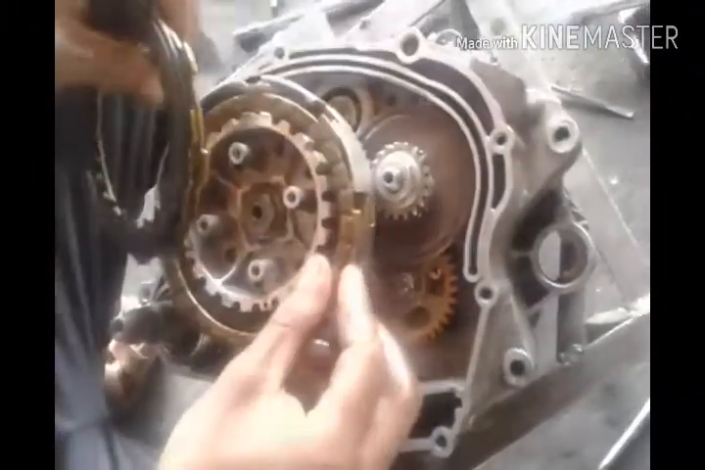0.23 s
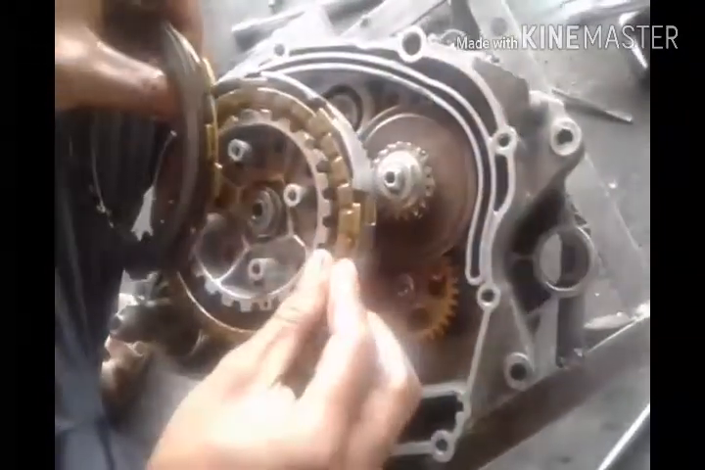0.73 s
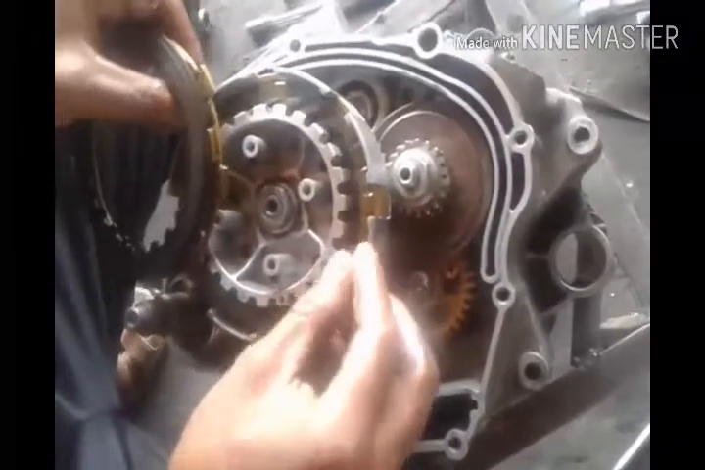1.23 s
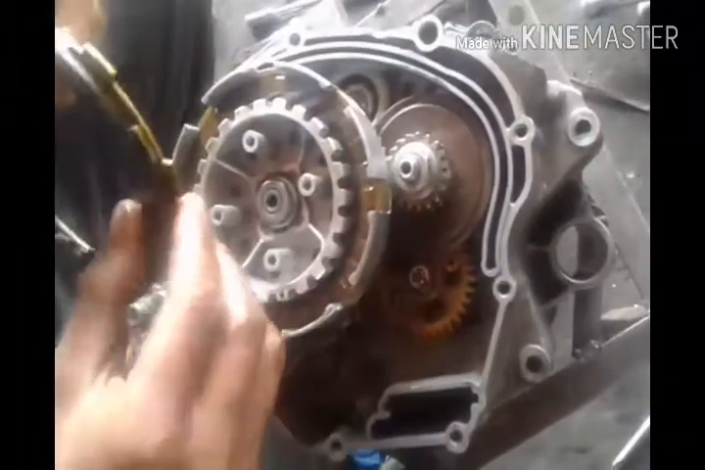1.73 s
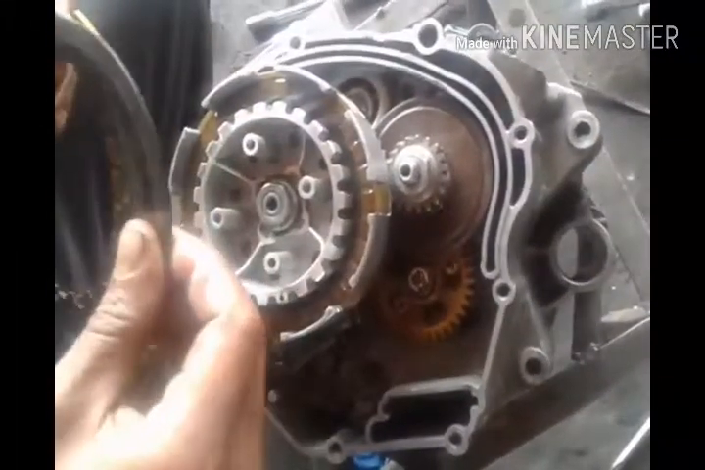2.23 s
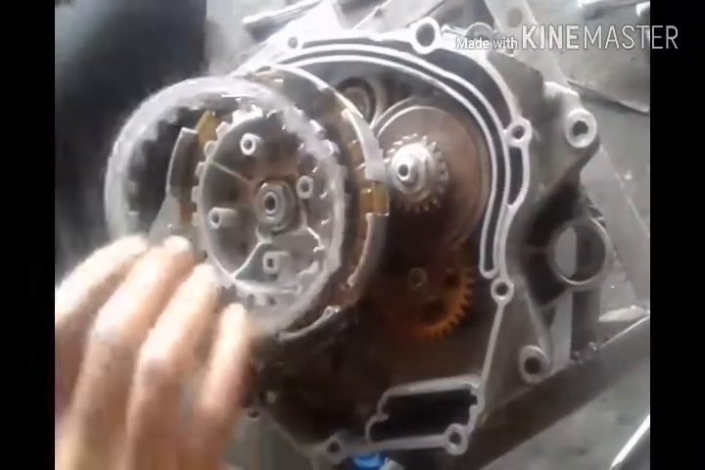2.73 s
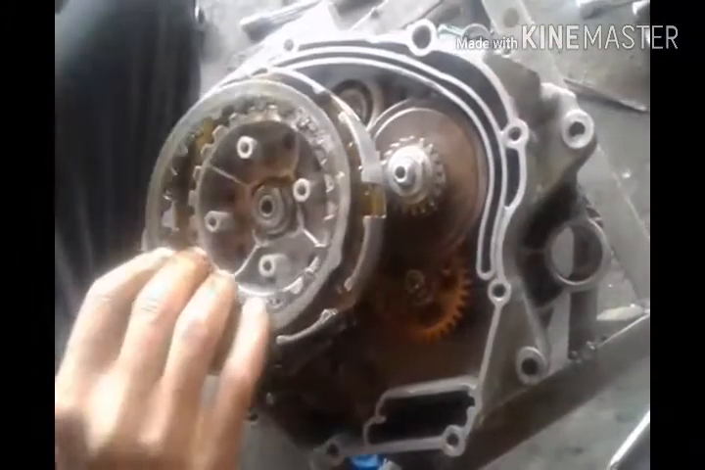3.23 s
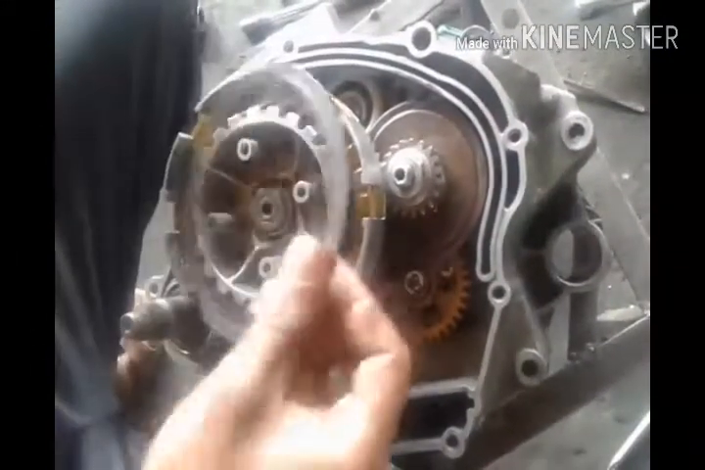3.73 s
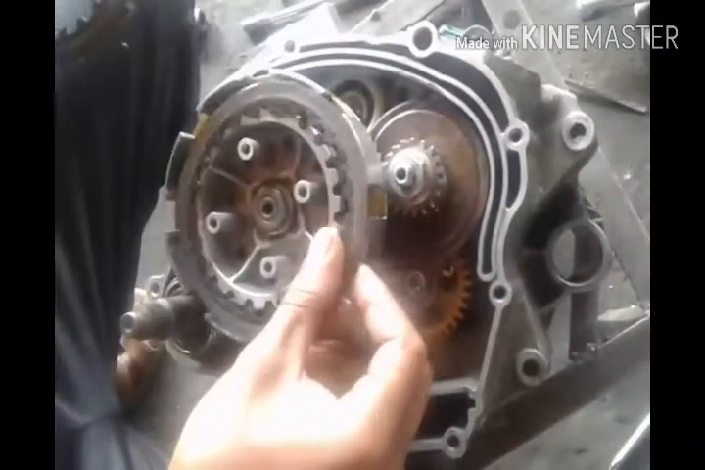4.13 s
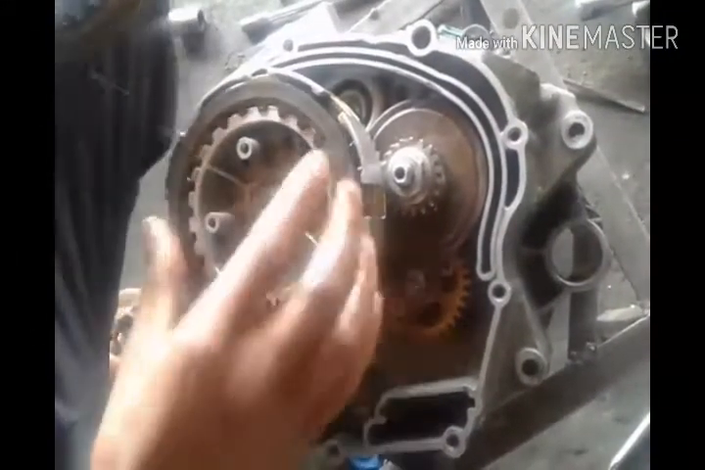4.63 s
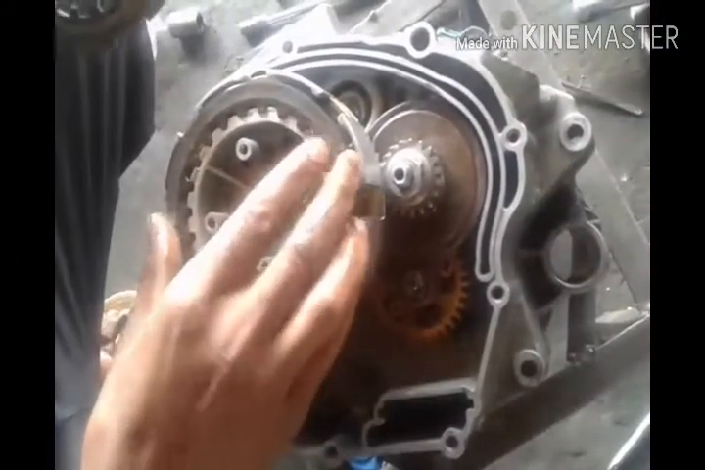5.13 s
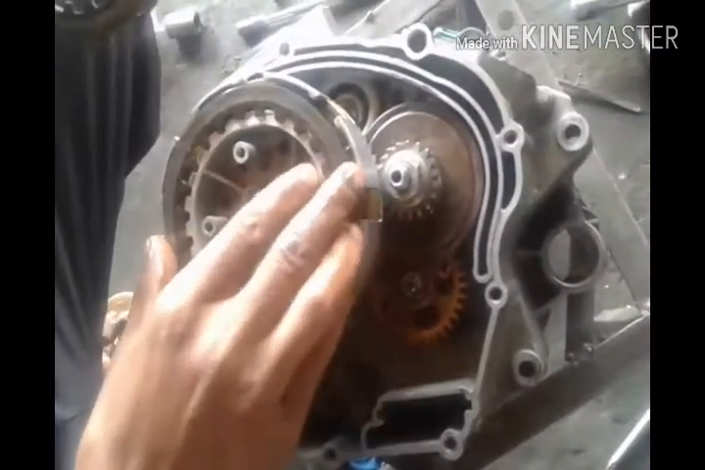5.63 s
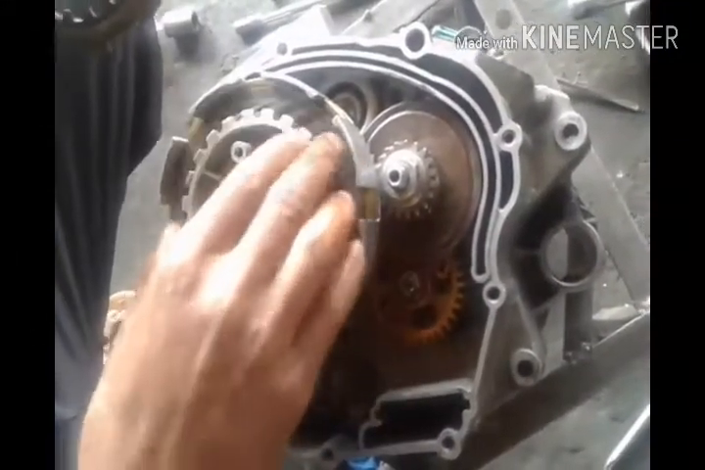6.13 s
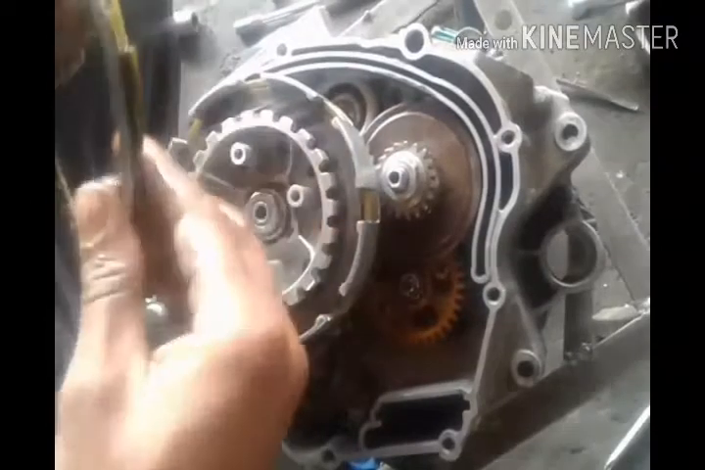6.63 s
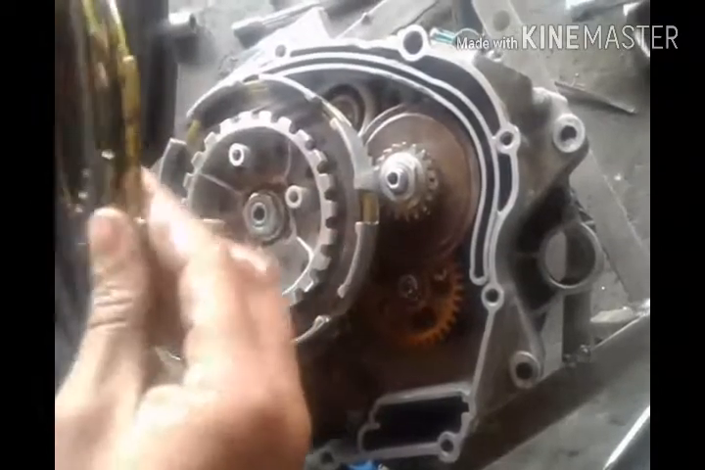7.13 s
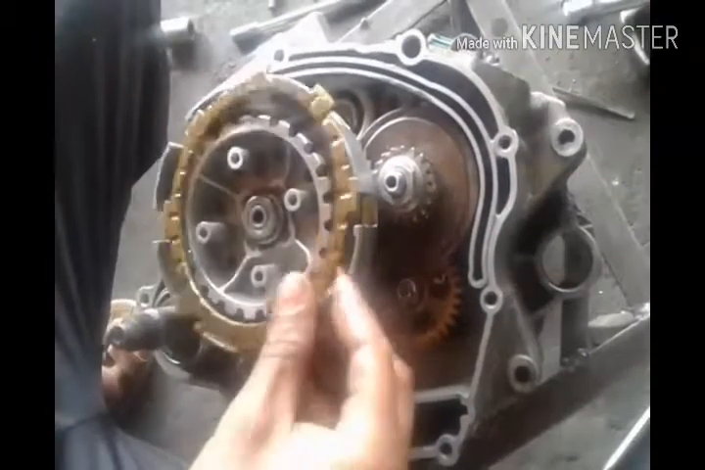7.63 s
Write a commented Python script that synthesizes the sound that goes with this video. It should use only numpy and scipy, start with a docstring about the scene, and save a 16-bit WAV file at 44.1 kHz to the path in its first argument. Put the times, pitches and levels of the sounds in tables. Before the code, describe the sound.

A small, hard, reverberant workshop with a close microphone and street rumble outside. Loud, bright steel blows crack at about 0.1 and 0.5 s, followed by three quieter, duller taps at 0.9, 1.4 and 1.85 s. Five more hard blows fall at 2.3, 2.7, 3.1, 3.6 and 4.0 s, some with quick rebounds, each ringing briefly in the room. Outside, a low motor drone with wavering tones swells near 2.1 s, drops slightly in pitch and passes. From 3.5 to 3.8 s thin clutch plates tick lightly; a cluster of small clinks and short pings follows at 4.5 to 4.7 s. Then only traffic remains until, around 5.5 s, a second vehicle draws near and stays: deep rumble, fluttering hiss, and rapid bright engine ticking strongest from about 6.2 to 7.3 s. Faint, thin, high squeals come in short bursts from 6 to 6.7 s. Rumble and clatter continue to the end, near 8 s.

```python
"""A small hard-walled workshop: close to the microphone steel is struck in a steady beat, two blows, three light
taps, five more blows, each a dispersed crack through resonances that rings in the room. Outside a motor drones
past as wavering sines. From 3.5 s clutch plates tick and clink on a hub's splines, as pulses and damped modes.
Then a second vehicle draws near: filtered noise makes its rumble, hiss and ticking, and thin tones squeal.
A limiter ducks the peaks."""
import sys
import numpy as np
from scipy import signal
from scipy.fft import rfft, irfft, next_fast_len
from scipy.io import wavfile
from scipy.ndimage import uniform_filter1d, minimum_filter1d

SR = 44100
rng = np.random.default_rng(int(sys.argv[2]) if len(sys.argv) > 2 else 0)


def wav_record(signal):
    """Record a signal, one row per channel, as 16-bit PCM in the file named by sys.argv[1]."""
    frames = np.transpose(np.atleast_2d(signal))
    bounded = np.clip(frames, -1, 1)
    # unit amplitude maps onto the largest positive 16-bit level
    quanta = np.round(bounded * 32767).astype(np.int16)
    wavfile.write(sys.argv[1], SR, quanta)


N = 347508
TIME = np.arange(N) / SR


def hammer(graze_s=0.0049, graze_contact_s=0.0052, rebound_contact_s=0.00086, rebound_within_s=.2):
    """Each blow grazes, lands and may rebound; the pressed steel rings briefly, at pitches set by how it sits."""
    # hammer blows on steel: t/s, strength/dB, body f/Hz, body width/Hz, room t60/s, body over the crack/dB,
    #   low knock over the crack/dB, thin ring f/Hz, thin ring level/dB, upper resonance f/Hz,
    #   upper resonance over the crack/dB, gain in the hollow above the body/dB, graze before landing/dB
    blow_rows = [(0.0744, 4.5, 4290, 498.8, 0.3654, 21, -11.5, 4345, -24, 7517, 8, -7.5, -22.5),
                 (0.5319, 0.8849, 4525, 651.3, 0.36766, 17.5, -28.5, 3978, -19.5, 6719, 2, -3, -15),
                 (2.2560, 9, 3767, 648, 0.3166, 11.5, -9.5, 3824, -30, 6160, -5.5, 0, -8.5),
                 (2.676, 6, 3737, 450, 0.30975, 11, 8, 3975, -22.5, 5657, -2.5, 0, -6),
                 (3.1190, 4.5, 3716, 652.5, 0.3353, 10, 3, 3975, -26.5, 6242, -4.5, 1.5, -2.5),
                 (3.569, 4.5, 3852, 550.3, 0.31415, 13.5, 4.5, 3716, -23.5, 5349, -1.5, -1, -3),
                 (4.038, 4, 3850, 260.3, 0.3233, 16.5, 10.5, 3985, -16, 5535, -0.5, -2.5, -10)]
    # the struck steel jumps and knocks again: t/s, level relative to its blow/dB
    rebound_rows = [(.1030, -5), (0.111, -4), (.1390, -3), (0.5738, -6.5), (.6260, -10.5), (2.2720, 0),
                    (2.2890, -3), (2.3490, -11.5), (2.7180, -5), (2.7420, -5), (3.1220, 1.5), (3.5750, 2),
                    (3.5830, 1.5), (4.0440, -1.5)]
    # crack of steel on steel: multiple of the body pitch, level/dB
    crack_colour = [(.05, -29), (0.149, -13.5), (.4, -20), (.62, -13), (.77, 0), (1.02, 1.5), (1.3, 0),
                    (1.75, -5), (2.15, -11.5), (2.5, -15.5), (2.9, -18.5), (3.6, -20)]
    # shared by all blows: the low knock, the hollow between body and upper resonance, the thin ring
    knock_hz, knock_width_hz = 628, 1012.3
    hollow_hz, hollow_width_hz, upper_width_hz = 5537.2, 1893, 536
    ring_t60_s, ring_build_s = 0.4054, 0.003465
    lead_s = .002   # the crack peaks just after it starts

    out, t = np.zeros(N), TIME[:SR // 2]
    for (s, db, body_hz, body_width_hz, t60, body_db, knock_db, ring_hz, ring_db,
         upper_hz, upper_db, hollow_db, graze_db) in blow_rows:
        crack = disperse(snap([(k * body_hz, level) for k, level in crack_colour]), spread_s=.004)
        modes = [(body_hz, body_width_hz, body_db),
                 (upper_hz, upper_width_hz, upper_db),
                 (knock_hz, knock_width_hz, knock_db)]
        body = sum(from_db(gain_db) * resonate(crack, hz, width) for hz, width, gain_db in modes)
        blow = from_db(db) * (crack + body)
        blow = blow + (from_db(hollow_db) - 1) * resonate(blow, hollow_hz, hollow_width_hz)
        add(out, s - lead_s, workshop(blow, echo_db=-2, tail_db=9, t60=t60, build_s=0.002077))
        add(out, s - lead_s - graze_s, from_db(graze_db) * chatter(blow, graze_contact_s))
        for again_s, again_db in rebound_rows:
            if s < again_s < s + rebound_within_s:
                add(out, again_s - lead_s, from_db(again_db) * chatter(blow, rebound_contact_s))
        thin_ring = from_db(ring_db) * twin_mode(t, ring_hz, ring_t60_s, split_hz=44.4, twin_db=-5.5)
        ring = thin_ring + steel_ring(t, body_hz)
        add(out, s, ring * (1 - np.exp(-t / ring_build_s)))
    return out


def steel_ring(t, body_hz, t60=0.361, favour_octaves=0.253, scatter_db=2.5):
    """The narrow modes that one blow sets ringing, each with its own strength; they beat against each other."""
    # narrow modes of the struck steel, loudest near the body pitch: f/Hz, level/dB
    steel_modes = [(3297, -32.5), (3562, -32), (3716, -26.5), (4187, -29.5), (4317, -24), (4375, -34),
                   (4525, -29), (4797, -29), (5296, -28.5), (5464, -25.5), (6350, -32.5), (6702, -32.5)]
    out = np.zeros(len(t))
    for hz, db in steel_modes:
        strength = from_db(db + scatter_db * rng.standard_normal())
        level = favoured(hz, body_hz, favour_octaves) * strength
        out += level * np.sin(2 * np.pi * (hz * t + rng.random()))
    return out * 1000. ** (-t / t60)


def setting_taps():
    """Light taps in the same beat: a duller spray of small impacts, ringing in the room."""
    # taps: t/s, strength/dB, energy decay time of the contact/s, room t60/s
    tap_rows = [(0.934, -8.5, 0.001343, 0.2658), (1.392, -6.5, 0.001277, 0.2707),
                (1.845, -8.5, 0.00691, 0.4064)]
    # colour of a tap, duller than a blow: f/Hz, level/dB
    tap_colour = [(300, -33), (1900, -10.5), (2650, 7.5), (3300, 3), (4050, 8.5), (4800, 8), (5600, 9),
                  (6800, -11.5), (10000, -28), (14000, -28)]
    out = np.zeros(N)
    for s, db, contact_s, t60 in tap_rows:
        tap = from_db(db) * chatter(snap(tap_colour), contact_s)
        add(out, s, workshop(tap, echo_db=-6.5, tail_db=4.5, t60=t60, build_s=0.002753))
    return out


def plates(ping_db=13, ping_width_hz=330, damped_t60=0.0507, buzz=0.2477):
    """A touch ticks and rings favoured modes; they buzz on the splines until finger or hub damps them."""
    # a plate's teeth touching the hub: t/s, tick level/dB, ring level/dB, pitch the contact favours f/Hz,
    #   spread around it/octaves, free to ring for/s
    touch_rows = [(3.5275, -0.5, -37.5, 3609, 0.0517, 0.01233),
                  (3.7648, -0.5, -25.5, 4210, 0.04004, 0.01371), (3.777, -9.5, -29, 3604, 0.03944, 0.0121),
                  (3.8245, -8, -28.5, 4260, 0.04025, 0.0119), (4.4850, -27.5, -29, 2703, 0.1696, 0.0429),
                  (4.4920, -29.5, -35.5, 5100, 0.112, 0.01207),
                  (4.5385, -3.5, -18.5, 4650, 0.2785, 0.04565), (4.5470, -24, -30.5, 2109, 0.193, 0.0847),
                  (4.5535, -5, -27, 4988, 0.1541, 0.0319), (4.6340, -27.5, -33, 3875, 0.0786, 0.056),
                  (4.643, -18.5, -30.5, 5098, .15, 0.0648), (4.675, -30, -39, 2457, 0.208, 0.089)]
    # modes of a steel plate: f/Hz, level/dB, t60/s
    plate_modes = [(2107.9, -3.5, 2.116), (2712.2, -8, 0.64), (3598, -5.5, 0.058), (3875, 3, 0.3574),
                   (4243.9, -5, 0.06194), (4601.7, -9, 0.0592), (5103, -11.5, 0.4107), (7531, -8, 0.2514)]
    # tick of a held plate: f/Hz, level/dB
    tick_colour = [(300, -22.5), (1400, -6.5), (2400, -17), (3500, -0.5), (4300, -1), (5500, -2.5),
                   (6600, -9.5), (7600, -7), (9000, -14.5), (14000, -19)]
    out, t = np.zeros(N), TIME[:SR // 2]
    tick = disperse(snap(tick_colour), spread_s=.002)
    for s, tick_db, ring_db, favoured_hz, spread_octaves, free_s in touch_rows:
        ping = from_db(ping_db) * resonate(tick, favoured_hz, ping_width_hz)
        add(out, s, from_db(tick_db) * chatter(tick, contact_s=0.002011))
        add(out, s, from_db(tick_db) * ping)
        damping = 1000. ** (-np.maximum(t - free_s, 0) / damped_t60)
        onset = 1 - np.exp(-t / 0.00108)
        envelope = damping * onset * (1 + buzz * drift(207, size=len(t)))
        for hz, db, t60 in plate_modes:
            level = favoured(hz, favoured_hz, spread_octaves) * from_db(ring_db + db)
            add(out, s, level * twin_mode(t, hz, t60, split_hz=12.574, twin_db=-14.5) * envelope)
    return workshop(out, echo_db=-16, tail_db=-9, t60=.18)[:N]


def squeals():
    """Rubbing metal squeals thinly: short wavering tones that start and stop abruptly."""
    # squeals: middle t/s, half length to 1/e of the level/s, f/Hz, level/dB
    squeal_rows = [(3.025, 0.04744, 4092, -42.5), (3.095, 0.02748, 4021, -45.5), (3.54, 0.02195, 1180, -42),
                   (6.02, 0.0382, 3955, -41.5), (6.215, 0.01524, 3950, -38), (6.325, .025, 3970, -37),
                   (6.408, 0.02133, 3965, -36.5), (6.485, 0.04, 3965, -37), (6.605, 0.02703, 3963, -35.5),
                   (6.67, 0.02956, 3956, -37.5)]
    return swells(squeal_rows, unsteady=0.005, rough_db=2.5, order=4)


def motor(unsteady=0.008147, rough_db=2.0):
    """An uneven exhaust note with its orders swells and drops in pitch as it passes; drones waver above it."""
    # orders of the passing motor: multiple of the note, level/dB
    order_rows = [(1, -5), (1.5, -14.5), (2, -18), (3, -14), (3.5, -9.5)]
    # droning tones that swell and fade: middle t/s, half length to 1/e of the level/s, f/Hz, level/dB
    drone_rows = [(0.2619, 0.2696, 224, -38.5), (0.9475, 0.32148, 273.3, -39.5), (1.95, 0.33054, 294, -38),
                  (1.852, 0.24743, 333, -42.5), (1.833, 0.9372, 394.5, -50), (2.4258, 0.41896, 351, -40),
                  (2.95, 0.7675, 163.9, -42)]
    nearest_s, pass_s, level_db = 2.13, 0.16692, -26.5
    centre_hz, doppler_hz, doppler_s = 82.443, 2.9, 0.50286   # note when nearest, Doppler swing either side
    note_hz = centre_hz - doppler_hz * np.tanh((TIME - nearest_s) / doppler_s)
    phase = 2 * np.pi * np.cumsum(note_hz * (1 + unsteady * drift(24.73))) / SR
    orders = sum(from_db(level_db + db + rough_db * drift(16)) * np.sin(k * phase) for k, db in order_rows)
    passing = np.sqrt(2 * nearness(nearest_s, pass_s)) * orders
    return passing + swells(drone_rows, unsteady=0.008561, rough_db=2.5)


def valves(t60=0.04127, rise_s=0.000825, first_s=5.2131, ticks_per_s=41.1):
    """One burst of bright clatter each engine turn, some stronger than others."""
    # level of the nearer engine's ticking: t/s, level/dB
    level_curve = [(5.2, -59), (6.05, -28), (6.3, -27), (6.56, -25), (6.72, -35), (6.88, -25.5), (7.3, -27),
                   (7.88, -29.5)]
    # its sharpest ticks, in place of the regular ones beside them: t/s, level/dB
    sharp_ticks = [(6.2837, -25), (6.3337, -22), (6.3569, -22.5), (6.4545, -24.5), (6.5269, -26),
                   (6.8425, -26), (6.8669, -20.5), (6.8914, -21.5), (6.9391, -22), (7.0123, -26.5),
                   (7.0371, -26), (7.0621, -23), (7.1595, -27.5), (7.2593, -25)]
    # colour of one tick: f/Hz, relative level per Hz/dB
    clatter_colour = [(1300, -15.5), (2500, -17.5), (2950, 0.5), (3400, 4.5), (3900, 3.5), (4900, -3.5),
                      (6300, -11.5), (7200, -20), (8000, -16.5), (9200, -30), (15000, -57)]
    beats = np.arange(first_s, TIME[-1], 1 / ticks_per_s)
    uneven_db = 1.5821 * rng.uniform(-1.037, 1, len(beats))
    beat_db = np.interp(beats, *np.transpose(level_curve)) + uneven_db
    to_sharp_s = np.abs(beats[:, None] - np.array(sharp_ticks)[:, 0]).min(axis=1)
    ordinary = to_sharp_s > .5 / ticks_per_s
    power, t = np.zeros(N), TIME[:SR // 10]
    burst = 1000. ** (-t / t60) * (1 - np.exp(-(t / rise_s) ** 2))
    for s, db in [*zip(beats[ordinary], beat_db[ordinary]), *sharp_ticks]:
        add(power, s - rise_s, (from_db(db) * burst) ** 2)
    return np.sqrt(power) * noise(clatter_colour)


def street(flutter_db=.9):
    """Rumble, road noise and a slightly fluttering hiss swell together as vehicles go past, draw up or rev."""
    # far traffic, always there: road level/dB, rumble over it/dB, hiss over it/dB
    far = (-56.5, 2.98, -5.5)
    # swells of traffic noise, as vehicles go past or rev: loudest at t/s, time scale of the swell/s,
    #   road level/dB, rumble over it/dB, hiss over it/dB
    swell_rows = [(.16, 0.49075, -42.5, 6.5, -1.4638), (2.16, 0.34446, -36, 7, 0.2445),
                  (4.1, 2.4492, -44.5, 6, 1), (6.4, 0.2684, -39, 2, -4)]
    # the second vehicle draws up and stays: half its power at t/s, rise time/s, road level/dB,
    #   rumble over it/dB, hiss over it/dB
    arrival = (5.5, 0.0906, -37, 5, 2)
    # the street noise is briefly louder at first: half its power at t/s, fade time/s, road level/dB,
    #   rumble over it/dB, hiss over it/dB
    surge = (0.026, 0.0081, -32.5, 8.5, -0.5)
    # colours of the street: f/Hz, relative level per Hz/dB
    rumble_colour = [(15, -54), (28, -27), (45, -17.5), (63, -2.5), (97, -1.5), (165, 1), (237, -1),
                     (360, -7), (440, -13), (600, -13.5), (780, -22), (1320, -70.5)]
    road_colour = [(240, -40), (400, -5), (471, -4), (515, 0.5), (554, -2), (1090, -2), (1700, -2.5),
                   (2250, -9.5), (2800, -10.5), (3640, -85), (6160, -120)]
    hiss_colour = [(1300, -15), (2200, -19.5), (2600, -13), (2880, -3), (3120, 1.5), (3450, 1.5),
                   (4050, 4.5), (4900, -1), (5400, -5.5), (6500, -11.5), (7100, -19), (7900, -15),
                   (9200, -35), (10800, -33), (12000, -54.5), (15000, -57.5)]
    sources = [(np.ones(N), *far),
               (fade_in(*arrival[:2]), *arrival[2:]),
               (1 - fade_in(*surge[:2]), *surge[2:])]
    # squared, for a steeper swell: walls screen passing vehicles further off
    sources += [(nearness(s, swell_s) ** 2, *levels) for s, swell_s, *levels in swell_rows]
    total_power = sum(np.outer(from_db([db, db + rumble_db, db + hiss_db]) ** 2, power)
                      for power, db, rumble_db, hiss_db in sources)
    road, rumble, hiss = np.sqrt(total_power)
    flutter = from_db(flutter_db * drift(40))
    return rumble * noise(rumble_colour) + road * noise(road_colour) + hiss * flutter * noise(hiss_colour)


def workshop(x, echo_db, tail_db, t60, build_s=0.00513, hold=1.215, grain_db=2.0,
             treble_hz=8500, treble_t60=0.435):
    """Direct sound, a few hard reflections, then a dense tail that builds, holds and dies, treble first."""
    # first reflections from floor, bench and walls: delay t/s, level before echo_db/dB
    echo_rows = [(.0040, -3), (.0140, -2), (.0175, -11), (.0290, -19), (0.038, -5)]
    t = TIME[:SR // 2]
    envelope = (1 - np.exp(-t / build_s)) * 1000. ** (-(t / t60) ** hold)
    tail = rng.standard_normal(len(t)) * envelope
    tail = tail * from_db(grain_db * drift(497.65, size=len(t)))   # reflections arrive in uneven clumps
    high_pass = signal.butter(3, treble_hz, "high", fs=SR, output="sos")
    treble = signal.sosfiltfilt(high_pass, tail)
    lost_treble = treble * (1 - 1000. ** (-t / treble_t60))
    response = from_db(tail_db) * (tail - lost_treble) / np.linalg.norm(tail)
    response[0] += 1   # direct sound
    for delay, db in echo_rows:
        response[round(delay * SR)] += from_db(db + echo_db)
    return signal.fftconvolve(x, response)


def disperse(x, spread_s):
    """Bending waves in steel: highs arrive first, so a click is drawn out without changing colour."""
    size = 8192
    delay = spread_s * SR * np.exp(-np.fft.rfftfreq(size, 1 / SR) / 6000)   # samples
    return irfft(rfft(x, size) * np.exp(-2j * np.pi * np.cumsum(delay) / size))


def chatter(x, contact_s):
    """A glancing contact is a spray of tiny impacts with the energy of one."""
    spray = rng.standard_normal(SR // 100) * np.exp(-TIME[:SR // 100] / (2 * contact_s))
    return signal.fftconvolve(x, spray / np.linalg.norm(spray))


def twin_mode(t, hz, t60, split_hz, twin_db):
    """A dying mode beats against a weaker, lower twin, because the steel is not quite symmetric."""
    twin_hz = hz + split_hz * rng.uniform(-1.4918, -0.518)
    twin = from_db(twin_db) * np.sin(2 * np.pi * (twin_hz * t + rng.random()))
    return (np.sin(2 * np.pi * hz * t) + twin) * 1000. ** (-t / t60)


def favoured(hz, centre_hz, octaves):
    """Share of a mode that a contact excites, less the further it lies from the favoured pitch."""
    return 1 / (1 + (np.log2(hz / centre_hz) / octaves) ** 2)


def resonate(x, hz, width_hz):
    """A resonance with gain of about 1 on top."""
    r = np.exp(-np.pi * width_hz / SR)
    zeros = np.array([1, 0, -1]) * (1 - r * r) / 2
    poles = [1, -2 * r * np.cos(2 * np.pi * hz / SR), r * r]
    return signal.lfilter(zeros, poles, x)


def snap(spectrum, size=1024):
    """The shortest causal pulse that has this spectrum (minimum phase, by way of the cepstrum)."""
    cepstrum = irfft(np.log(gains(spectrum, size)))
    cepstrum[1:size // 2] *= 2
    cepstrum[size // 2 + 1:] = 0
    return irfft(np.exp(rfft(cepstrum)))


def swells(rows, unsteady, rough_db, order=2):
    """Wavering tones, each rising and fading once; a higher order starts and stops more abruptly."""
    out = np.zeros(N)
    for middle, half, hz, db in rows:
        near = np.abs(TIME - middle) < np.pi * half
        t = TIME[near]
        envelope = np.exp(-((t - middle) / half) ** order)
        level = from_db(db + rough_db * drift(24.79, size=len(t))) * envelope
        pitch_hz = hz * (1 + unsteady * drift(40, size=len(t)))
        out[near] += level * np.sin(2 * np.pi * np.cumsum(pitch_hz) / SR)
    return np.sqrt(2) * out


def nearness(loudest_s, scale_s):
    """Share of the top power, as heard from something going past in a straight line."""
    return 1 / (1 + ((TIME - loudest_s) / scale_s) ** 2)


def fade_in(middle_s, rise_s):
    """A smooth step of power from 0 to 1."""
    return (1 + np.tanh((TIME - middle_s) / (2 * rise_s))) / 2


def noise(spectrum):
    """Coloured noise of rms 1."""
    size = next_fast_len(N)
    coloured = irfft(rfft(rng.standard_normal(size)) * gains(spectrum, size), size)
    return rms_one(coloured[:N])


def gains(spectrum, size):
    """A spectrum as gains on an FFT grid."""
    hz, db = np.transpose(spectrum)
    grid_hz = np.fft.rfftfreq(size, 1 / SR)
    return from_db(np.interp(np.log(grid_hz + 1), np.log(hz), db))


def drift(per_s, size=N):
    """Slow chance: straight lines between random knots of spread 1, per_s of them each second."""
    knots = rng.standard_normal(N // 100)
    return np.interp(TIME[:size] * per_s, np.arange(len(knots)), knots)


def from_db(db):
    """Decibels as an amplitude factor."""
    return 10 ** (np.asarray(db) / 20)


def rms_one(x):
    """Scale to an rms of 1."""
    return x / np.sqrt(np.mean(x ** 2) + 1e-20)


def add(out, s, sound):
    """Mix a sound in at time s."""
    start = max(round(s * SR), 0)
    out[start:start + len(sound)] += sound[:max(N - start, 0)]


def scene():
    """Steel and plates indoors, with the street outside, on one microphone."""
    close_by = hammer() + setting_taps() + plates() + squeals()
    outdoors = motor() + valves() + street()
    return (close_by + outdoors)[None]


def record(dry, limit_db=-4.6, release_db_per_s=90, cutoff_hz=14300):
    """A limiter ducks just ahead of each peak and soon recovers; the top is cut."""
    over_db = np.maximum(20 * np.log10(np.abs(dry[0]) + 1e-9) - limit_db, 0)
    held_db = np.maximum.accumulate(over_db + release_db_per_s * TIME) - release_db_per_s * TIME
    # the windows, in samples, reach ahead of the peak and smooth the duck
    gain_db = uniform_filter1d(minimum_filter1d(-held_db, size=441), size=221)
    low_pass = signal.ellip(10, .1, 80, cutoff_hz, fs=SR, output="sos")
    return signal.sosfilt(low_pass, dry * from_db(gain_db))


dry = scene()
out = record(dry)
wav_record(out)
```